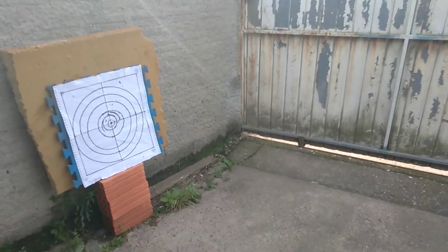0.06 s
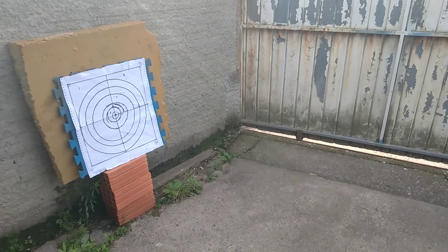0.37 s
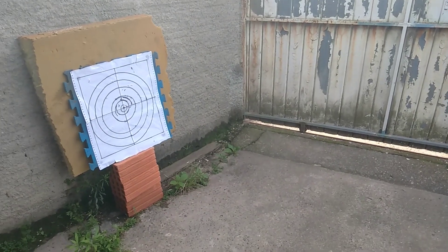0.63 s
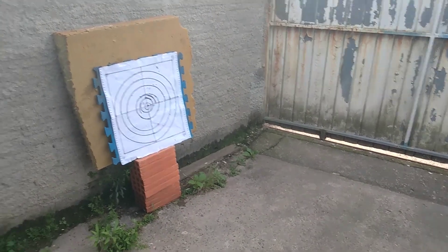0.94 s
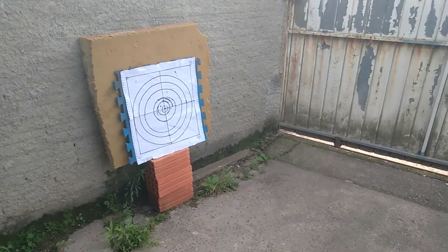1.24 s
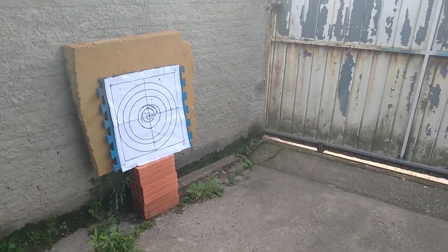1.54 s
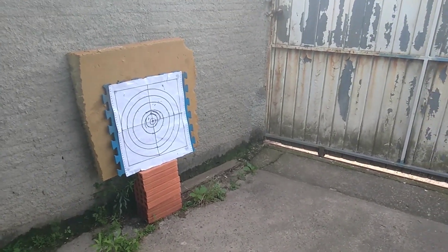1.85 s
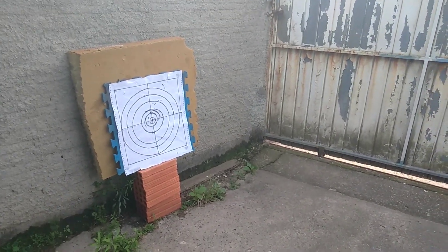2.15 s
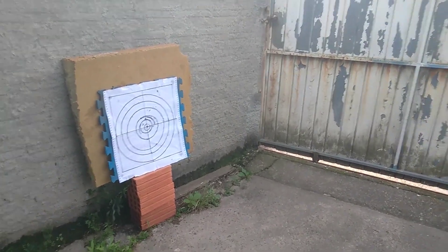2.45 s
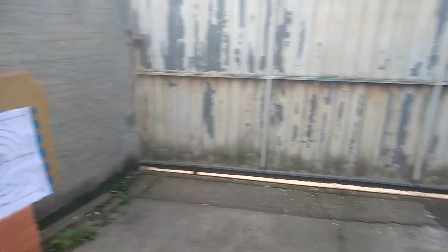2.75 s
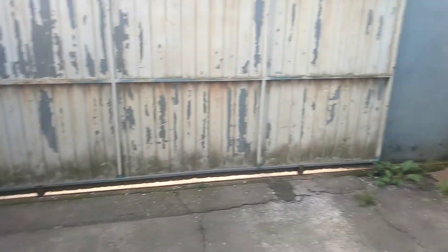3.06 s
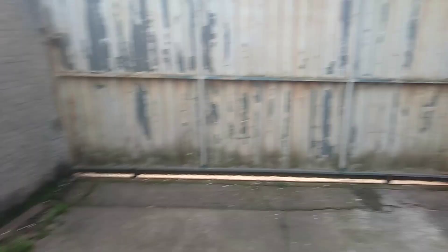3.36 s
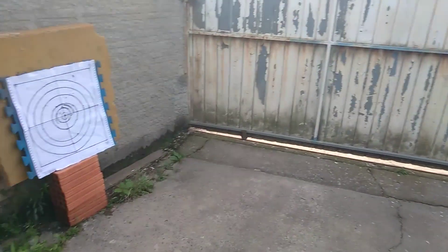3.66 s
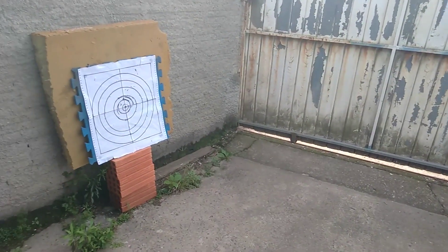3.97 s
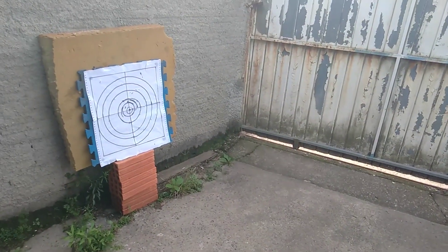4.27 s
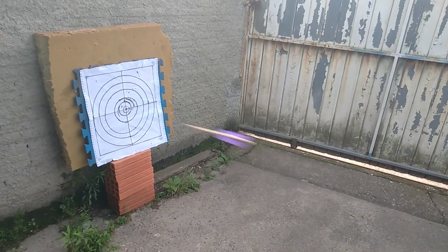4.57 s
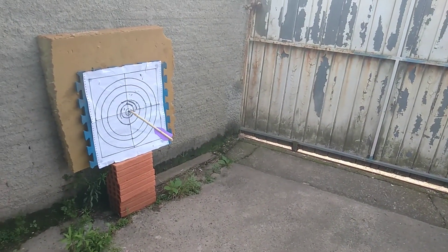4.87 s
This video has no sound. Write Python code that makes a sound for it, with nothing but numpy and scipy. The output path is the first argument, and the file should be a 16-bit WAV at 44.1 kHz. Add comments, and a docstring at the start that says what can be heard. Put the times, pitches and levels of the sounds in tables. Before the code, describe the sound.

In a small walled yard, faint birds twitter and distant dogs yelp over a low town rumble. Close to the microphone, a sleeve rustles and a hand makes soft scuffs and clicks while aiming. Near the end a crossbow fires with a sharp, woody snap. A split second later the arrow cracks through a paper target and thumps into the board behind it, both hits echoing briefly.

```python
"""A homemade crossbow fires in a small walled concrete yard: impacts of latch, string and limbs
excite the modes of its stock. A fifth of a second later the arrow cracks through a paper target
and drives the low modes of the board behind it. The walls return each impact as reverberation.
Before the shot, aiming makes soft friction rustles, scuffs and clicks, while small birds chirp,
far dogs yelp and a motor revs over the low rumble of a town."""
import sys
import numpy as np
from scipy import signal
from scipy.fft import rfft, irfft, next_fast_len
from scipy.io import wavfile

SR = 44100
rng = np.random.default_rng(int(sys.argv[2]) if len(sys.argv) > 2 else 0)


def dump_mix(stems):
    """Bounce the given channels to the path in sys.argv[1] as a 16-bit WAV at rate SR."""
    frames = np.atleast_2d(stems).T  # one column per channel
    limited = np.clip(frames, -1, 1)  # hard clip at full scale
    pcm = np.round(limited * 32767).astype(np.int16)
    wavfile.write(sys.argv[1], SR, pcm)


N = 216442
TIME = np.arange(N) / SR
ARRIVAL_S = 4.6882   # the arrow reaches the target


def from_db(db):
    """Amplitude ratio: a factor of ten for every 20 dB."""
    return 10 ** (np.asarray(db) / 20)

def unit_power(x):
    """Normalisation to a mean square of one."""
    return x / np.sqrt(np.mean(x ** 2) + 1e-20)

def at_hz(points, hz):
    """Interpolation on a logarithmic frequency axis."""
    f, value = np.transpose(points)
    return np.interp(np.log(np.maximum(hz, 1)), np.log(f), value)

def add(out, start_s, sound):
    """Superposition: a short sound sums into the mix at its onset."""
    start = max(round(start_s * SR), 0)
    out[start:start + len(sound)] += sound[:max(N - start, 0)]

def waver(size, rate):
    """Random modulation: a line through `rate` Gaussian values a second."""
    return np.interp(TIME[:size] * rate, np.arange(size), rng.standard_normal(size))

def swells(rows, rise, rest_db):
    """Incoherent addition: triangular envelopes, rising for the share `rise`, sum in power."""
    power = from_db(rest_db) ** 2
    for peak_s, length_s, db in rows:
        corners_s = [peak_s - rise * length_s, peak_s, peak_s + (1 - rise) * length_s]
        power = power + np.interp(TIME, corners_s, [0, from_db(db), 0]) ** 2
    return np.sqrt(power)

def colour(x, spectrum, keep_power=True):
    """Minimum-phase filtering: a folded cepstrum gives the spectrum a causal response."""
    size = 2 * next_fast_len(N * 2 // 3)
    gain = from_db(at_hz(spectrum, np.fft.rfftfreq(size, 1 / SR)))
    cepstrum = irfft(np.log(unit_power(gain) if keep_power else gain))
    cepstrum[1:size // 2] *= 2
    response = np.exp(rfft(cepstrum[:size // 2], size))
    return irfft(rfft(x, size) * response)[..., :N]

def ring(force, modes):
    """Modal superposition: each mode answers an impulse with a damped sinusoid."""
    out = 0
    for hz, db, t60 in modes:
        r, w = from_db(-60 / (t60 * SR)), 2 * np.pi * hz / SR   # pole radius and angle
        mode = signal.lfilter([0, np.sin(w)], [1, -2 * r * np.cos(w), r * r], force + 1e-18)
        out = out + from_db(db) * mode
    return out

def contacts(rows, start_s=0, slips=6):
    """All-pass dispersion: micro-slips spread each contact in time and leave its spectrum flat."""
    out = np.zeros(N)
    for s, db, smear_s in rows:
        burst = signal.unit_impulse(SR // 10)
        for lag in 2 + (smear_s * SR * rng.uniform(.1, 1, slips)).astype(int):
            allpass = np.r_[.5, np.zeros(lag), 1]
            burst = signal.lfilter(allpass, allpass[::-1], burst)
        add(out, start_s + s, from_db(db) * burst)
    return out

# Left-right coherence of sound from all around: frequency_hz, correlation
FIELD_COHERENCE = [(60, 0.95), (130, 0.94), (290, 0.9), (640, 0.55), (1410, -0.24), (3000, -0.023)]
def diffuse(size, coherence=FIELD_COHERENCE):
    """Diffuse field: white noise whose two channels agree at long wavelengths and part at short."""
    mid, side = rfft(rng.standard_normal((2, size)))
    alike = np.clip(at_hz(coherence, np.fft.rfftfreq(size, 1 / SR)), -1, 1)
    stereo = np.sqrt(1 + alike) * mid + np.sqrt(1 - alike) * side * [[1], [-1]]
    return unit_power(irfft(stereo, size))

def far_off(x, t60):
    """Multiple scattering: distant sound arrives only as decaying echoes between houses."""
    response = unit_power(diffuse(SR) * from_db(-60 * TIME[:SR] / t60)) / np.sqrt(SR)
    return signal.fftconvolve(x[None], response, axes=1)[:, :N]

# Reverberation time of the yard: frequency_hz, t60_s
YARD_DECAY = [(80, 0.35), (250, 0.46), (700, 0.43), (2000, 0.39), (4500, 0.37), (8000, 0.24), (15000, 0.2)]
def yard(x, direct_db, early_db, early_t60, late_db, build_s, coherence=FIELD_COHERENCE):
    """Reverberation: direct sound, dense early wall reflections and a tail that decays by band."""
    size = SR // 2
    t, hz = TIME[:size], np.fft.rfftfreq(size, 1 / SR)
    field, late = rfft(diffuse(size)), 0
    for centre, t60 in YARD_DECAY:
        band = at_hz([(f, f == centre) for f, _ in YARD_DECAY], hz)   # fades into its neighbours
        late = late + irfft(field * band, size) * from_db(-60 * t / t60)
    early = diffuse(size, coherence) * from_db(-60 * t / early_t60)
    build = 1 - np.exp(-(t / build_s) ** 2)   # reflections need time to arrive
    early = from_db(early_db) * unit_power(early * build)
    late = from_db(late_db) * unit_power(late * build)
    response = (early + late) / np.sqrt(size)
    response[:, 0] += from_db(direct_db)
    return signal.fftconvolve(x[None], response, axes=1)[:, :N]

# Spectra of open-air hiss and of town rumble: frequency_hz, relative_db
AIR_SPECTRUM = [(53, -31), (90, -3), (151, -7.5), (307, -10), (494, -14.5), (828, -14), (1360, -18),
                (2590, -18.5), (3500, -16), (4800, -18.5), (6200, -27), (10500, -33), (14200, -35),
                (15500, -61)]
RUMBLE_SPECTRUM = [(20, -35.5), (40, 3.5), (52, -11), (60, 4.5), (70, -9), (90, -9.5), (200, -45),
                   (1000, -77)]
def town(air_db=-60, rumble_db=-63, hum_db=-60, hum_hz=60.4):
    """Ambient noise: diffuse hiss and rumble, with a frequency-modulated hum."""
    air = from_db(air_db) * colour(diffuse(N), AIR_SPECTRUM)
    rumble = from_db(rumble_db) * colour(diffuse(N), RUMBLE_SPECTRUM)
    pitch_hz = hum_hz + 2 * waver(N, rate=6)
    hum = from_db(hum_db) * np.sin(2 * np.pi * np.cumsum(pitch_hz) / SR)
    return air + rumble + hum

# Strokes of a sleeve while aiming: peak_s, length_s, level_db
SLEEVE_STROKES = [(.02, 0.36, -66.5), (.42, 0.17, -64), (.775, .06, -58.5), (.86, 0.27, -68),
                  (.975, 0.13, -62.5), (1.13, 0.091, -62), (1.19, 0.57, -61.5), (1.34, 0.34, -62.5),
                  (1.51, 0.15, -59.5), (1.555, 0.38, -62), (1.665, 0.12, -59), (2.065, 0.15, -72.5),
                  (3.365, 0.08, -62.5)]
# Spectrum of rubbing cloth: frequency_hz, relative_db
CLOTH_SPECTRUM = [(300, -6), (1200, -7), (2400, 0), (4500, 0), (8000, 2.5), (12000, -3.5), (16000, -7)]
def sleeve(level_db=-2, grain_db=5, catch_db=1.5, crease_db=-4, creases_per_s=110, walls_db=5):
    """Stick-slip friction: cloth slides and catches, creases snap, and reflections blur into hiss."""
    hiss = rng.standard_normal(N)
    slide = unit_power(hiss * from_db(grain_db * waver(N, rate=260) + catch_db * waver(N, rate=65)))
    snaps = rng.random(N) < creases_per_s / SR
    creases = unit_power(snaps * from_db(3 * rng.uniform(-2, 2.3, N)))
    near = swells(SLEEVE_STROKES, rise=0.82, rest_db=-75) * (slide + from_db(crease_db) * creases)
    decay = np.exp(-1 / (0.023 * SR))   # reflected energy has a 23 ms time constant
    walls = np.sqrt(signal.lfilter([1 - decay], [1, -decay], near ** 2)) * diffuse(N)
    return from_db(level_db) * colour(near + from_db(walls_db) * walls, CLOTH_SPECTRUM)

def chirp(length_s, start_hz, end_hz, buzz_hz=130):
    """Frequency modulation: a linear glide with a fast random buzz."""
    u = np.linspace(0, 1, round(length_s * SR))
    pitch_hz = start_hz + (end_hz - start_hz) * u + buzz_hz * waver(len(u), rate=900)
    return np.sqrt(2) * np.sin(np.pi * u) * np.sin(2 * np.pi * np.cumsum(pitch_hz) / SR)

# Calls of the nearer birds, with one rising squeak of the stock at 1.28 s among them: start_s, start_hz,
# end_hz, level_db
BIRD_CALLS = [(.07, 5040, 5320, -59), (.17, 4500, 4160, -61), (.575, 5970, 6340, -64),
              (1.28, 2003, 2410, -52.5), (1.775, 4150, 4230, -61), (1.80, 3450, 3260, -61),
              (1.865, 5060, 5240, -57), (2.195, 5420, 5220, -59), (2.266, 4110, 3640, -56.5),
              (2.635, 7740, 6640, -65), (2.69, 7040, 6030, -65), (2.755, 4700, 3900, -62),
              (2.81, 7600, 6500, -66), (2.835, 5300, 5900, -59), (3.52, 5860, 5490, -54.5),
              (3.92, 6780, 6320, -63.5), (4.059, 3300, 3190, -59), (4.229, 6050, 5010, -56),
              (4.25, 4500, 3910, -62), (4.324, 6040, 5180, -69), (4.404, 5980, 5030, -57)]
# Bouts of twitter from the flock: peak_s, length_s, level_db
FLOCK_BOUTS = [(.18, 0.57, -58.5), (.46, 0.25, -62), (1.08, 0.93, -59.5), (1.29, 0.27, -54.5),
               (1.64, 0.42, -54.5), (1.92, 0.49, -62.5), (2.26, 0.2, -62), (2.48, 0.4, -57.5),
               (3.18, 0.63, -56), (3.62, 0.32, -57.5), (3.8, 0.59, -60), (4.28, 0.083, -69),
               (4.44, 0.53, -61)]
def birds(call_s=0.046, twitter_s=0.026, flock_hz=4400, spread=0.22, count=900):
    """Chorus effect: many overlapping chirps blur into twitter, and a few nearer ones stand out."""
    near, flock = np.zeros(N), np.zeros(N)
    for s, start_hz, end_hz, db in BIRD_CALLS:
        add(near, s, from_db(db) * chirp(call_s, start_hz, end_hz))
    for s, offsets in zip(rng.uniform(0, N / SR, count), rng.standard_normal((count, 2))):
        start_hz, end_hz = flock_hz * np.exp(spread * offsets)
        add(flock, s, chirp(twitter_s, start_hz, end_hz))
    bouts = swells(FLOCK_BOUTS, rise=0.48, rest_db=-82)
    return far_off(near, t60=0.34) + bouts * unit_power(far_off(flock, t60=0.44))

# Yelps of far dogs: start_s, length_s, pitch_hz, level_db
DOG_YELPS = [(0.306, 0.182, 812, -70.5), (0.763, .17, 800, -62), (1.518, 0.1653, 827.4, -50),
             (2.14, 0.17, 754, -64.5), (2.256, 0.155, 804.7, -54.5), (2.61, .15, 1043, -63.5),
             (3.039, 0.13, 607.5, -58.5), (3.22, 0.17, 1056, -65.5), (3.529, 0.157, 522, -61),
             (3.972, 0.086, 582, -62.5), (4.028, 0.13, 838.6, -53), (4.231, .15, 588.5, -60),
             (4.289, 0.14, 791.7, -52)]
def dogs(arch=0.1278, sag=0.059, jitter=0.055, overtone_db=-20):
    """Pitch jitter makes each arching yelp hoarse; distance leaves little but the fundamental."""
    out = np.zeros(N)
    for s, length_s, hz, db in DOG_YELPS:
        u = np.linspace(0, 1, round(length_s * SR))
        contour = 1 - arch * (2 * u - 1) ** 2 - sag * (u - .5)
        pitch_hz = hz * (contour + jitter * waver(len(u), rate=260))
        phase = 2 * np.pi * np.cumsum(pitch_hz) / SR
        voice = np.sin(phase) + from_db(overtone_db) * np.sin(2 * phase)
        add(out, s, from_db(db) * np.sqrt(2) * np.sin(np.pi * u) * voice)
    return far_off(out, t60=0.57)

def touches(rows, body_db, width_hz):
    """Resonance: each touch excites one band, which shifts with the place and the grip."""
    out = 0
    for s, db, smear_s, hz in rows:
        touch = contacts([(s, db, smear_s)])
        body = signal.lfilter(*signal.iirpeak(hz, hz / width_hz, fs=SR), touch + 1e-18)
        out = out + touch + from_db(body_db) * body
    return out

# Scuffs of a hand on the stock: start_s, level_db, smear_s, resonance_hz
HAND_SCUFFS = [(.752, -26, 0.0038, 1620), (.948, -27.5, 0.0037, 2420), (0.961, -27.5, 0.0029, 1800),
               (1.07, -35, .0015, 4460), (1.095, -43, 0.0017, 4400), (1.245, -31, 0.0031, 3940),
               (1.332, -29, 0.0032, 2570), (1.48, -30, 0.0054, 1850), (1.645, -30, 0.0034, 2580),
               (1.664, -37, 0.0035, 1860), (1.985, -33.5, 0.0027, 2020), (2.0605, -30.5, .0003, 1900),
               (3.344, -40, .0053, 2270), (3.389, -40, .0032, 1850)]
# A foot shifting on concrete: start_s, level_db, smear_s
FOOT_SHIFTS = [(1.706, -23, 0.0037)]
# Spectra of the hand and of the foot: frequency_hz, relative_db
HAND_SPECTRUM = [(200, -35), (900, -1), (1700, 0), (2500, 3.5), (4000, 3), (8000, 2), (15000, -14)]
FOOT_SPECTRUM = [(60, -30), (200, 6), (480, 11.5), (1000, -1), (3000, -3), (10000, -37)]
def scuffs(hand_db=-4, foot_db=-1):
    """Frictional excitation: a hand sounds the stock's hollow resonances and a foot scrapes dully."""
    hand = from_db(hand_db) * colour(touches(HAND_SCUFFS, body_db=13, width_hz=360), HAND_SPECTRUM)
    foot = from_db(foot_db) * colour(contacts(FOOT_SHIFTS), FOOT_SPECTRUM)
    return yard(hand + foot, direct_db=-1.5, early_db=1.5, early_t60=0.13, late_db=-2, build_s=0.0027)

# Clicks of the stock and of the lodged arrow: start_s, level_db, smear_s, resonance_hz
LIGHT_CLICKS = [(1.478, -30, .0009, 10500), (2.0612, -40, .0002, 6460), (2.157, -40.5, .0016, 7000),
                (2.5336, -37, .0003, 9000), (2.5425, -34, .0005, 9500), (2.5875, -34, .0004, 7800),
                (2.5965, -31.5, .0003, 6560), (4.8315, -22.5, .0005, 6600)]
# Spectrum of a click: frequency_hz, relative_db
CLICK_SPECTRUM = [(500, -39), (3200, -20), (6500, 3), (9000, -0.5), (13000, -2), (16000, -12)]
def clicks(level_db=-4):
    """Impulse excitation: brief contacts sound high, heavily damped resonances."""
    dry = from_db(level_db) * colour(touches(LIGHT_CLICKS, body_db=8, width_hz=1300), CLICK_SPECTRUM)
    return yard(dry, direct_db=-2, early_db=-3, early_t60=0.14, late_db=-8, build_s=0.0025)

# Two revs of a far motor: peak_s, length_s, level_db
MOTOR_REVS = [(2.33, 0.15, -56), (2.57, 0.42, -55.5)]
def motor(low_hz=100.6, top_hz=109, climb_hz_per_s=40.3):
    """Amplitude and frequency modulation: a rough tone swells twice, climbing from the first rev."""
    climb_hz = np.clip(low_hz + climb_hz_per_s * (TIME - MOTOR_REVS[0][0]), low_hz, top_hz)
    envelope = swells(MOTOR_REVS, rise=0.53, rest_db=-80.5) * from_db(2 * waver(N, rate=22))
    pitch_hz = climb_hz + 4 * waver(N, rate=26)
    return envelope * np.sin(2 * np.pi * np.cumsum(pitch_hz) / SR)

# Latch, string and limbs strike in turn: start_s, snap_db, latch_db, wood_db, smear_s
RELEASE_IMPACTS = [(4.4901, 1, 6.5, -11, 0.00013), (4.4934, -2.5, 7, -18, .00005),
                   (4.4963, -2.5, 9, -20, .00005), (4.5004, 0, -15, 1.5, 0.00011),
                   (4.5056, -9.5, -17, -0.5, .0004)]
# Spectrum of the string's snap: frequency_hz, relative_db
STRING_SPECTRUM = [(60, -50), (160, -8), (280, -3.5), (550, -10), (950, 2), (1300, -2), (1800, 6.5),
                   (3000, 5.5), (5000, 2.5), (8000, 10), (11000, 5.5), (14000, -0.5), (16000, -6)]
# Clinking modes of the latch: frequency_hz, level_db, t60_s
LATCH_RESONANCES = [(6500, -49, 0.012), (6740, -31, 0.02), (8100, -33, .02), (8130, -30, 0.02),
                    (9800, -29, .012), (11350, -29, .009)]
# Woody modes of stock and limbs: frequency_hz, level_db
STOCK_RESONANCES = [(740, -41), (860, -41), (1005, -35.5), (1120, -35), (1590, -40), (1655, -23.5),
                    (1720, -37), (2016, -29), (2300, -35.5), (2600, -34), (2910, -31)]
def crossbow(string_db=10, metal_db=5.5, stock_db=7, stock_t60=0.05, stock_low_hz=600):
    """Impact excitation: bright, then woody modes ring; the slim stock is a poor radiator of bass."""
    radiation = signal.butter(2, stock_low_hz, "high", fs=SR, output="sos")
    stock_modes = [(hz, db, stock_t60) for hz, db in STOCK_RESONANCES]
    out = 0
    for s, snap_db, latch_db, wood_db, smear_s in RELEASE_IMPACTS:
        blow = contacts([(s, 0, smear_s)])
        snap = from_db(string_db + snap_db) * colour(blow, STRING_SPECTRUM)
        clink = from_db(metal_db + latch_db) * ring(blow, LATCH_RESONANCES)
        knock = from_db(stock_db + wood_db) * signal.sosfilt(radiation, ring(blow, stock_modes))
        # each contact reaches the walls by its own paths
        out = out + yard(snap + clink + knock, direct_db=-19.5, early_db=-9, early_t60=0.16,
                         late_db=-9, build_s=0.00078)
    return out

# Point through paper, then shaft into foam: delay_s, level_db, smear_s, direct_db
PUNCTURES = [(0, 0.15, .00003, -18.5), (.0068, -1, .0005, -12)]
# Spectrum of bursting paper and foam: frequency_hz, relative_db
CRACK_SPECTRUM = [(60, -29), (170, -4), (280, 1), (480, -8.5), (850, -16.5), (1300, -15), (2200, -11),
                  (3300, -6), (3900, -8.5), (4700, -3), (7000, 1), (9500, 0.5), (12500, -6), (16000, -18)]
# Sound from one side, in antiphase near 3 kHz: frequency_hz, correlation (clipped at -1 in use)
CRACK_COHERENCE = [(250, 0.89), (550, 0.61), (920, 0.41), (1300, 0.66), (2100, 0.053), (2900, -1.7),
                   (3800, -1.4), (4900, 0.71), (6300, -0.1), (9000, -0.16)]
def arrow_crack(level_db=19.5):
    """Rupture and friction: the point bursts the paper, then the shaft rasps into the foam."""
    out = 0
    for delay_s, db, smear_s, direct_db in PUNCTURES:
        crack = colour(contacts([(delay_s, db, smear_s)], ARRIVAL_S), CRACK_SPECTRUM)
        out = out + yard(crack, direct_db, early_db=-4, early_t60=0.17, late_db=-9.5,
                         build_s=0.0014, coherence=CRACK_COHERENCE)
    return from_db(level_db) * out

# The arrow pushes the board, which rocks against the wall and settles: delay_s, level_db, push_s
BOARD_PUSHES = [(.0003, 0.2, 0.0011), (0.0397, -8, 0.00066), (.072, -8.5, .0013)]
# Modes of the leaning board: frequency_hz, level_db, t60_s
BOARD_RESONANCES = [(69, -15.5, 0.23), (117.6, -18.5, 0.33), (146.6, -19, .33), (173.4, -4, .08),
                    (186.2, -12, 0.21), (211.9, -13.5, 0.21), (250, -29, 0.38), (307, -22.5, 0.23),
                    (350, -23.5, 0.33), (433, -7.5, 0.031), (497, -28, 0.65), (577, -27, 0.19)]
def board_thump(level_db=-9):
    """Momentum transfer: soft force pulses from the stopping arrow set low plate modes booming."""
    force = 0
    for delay_s, db, push_s in BOARD_PUSHES:
        push = np.exp(-((TIME - ARRIVAL_S - delay_s - push_s) / (push_s / 2)) ** 2)
        force = force + from_db(db) * push / push.sum()
    boom = from_db(level_db) * ring(force, BOARD_RESONANCES)
    return yard(boom, direct_db=0.5, early_db=-20.5, early_t60=0.17, late_db=-15.5, build_s=0.025)

def scene():
    """Linear superposition: the shot and the aiming add to the quiet sounds around the yard."""
    shot = crossbow() + arrow_crack() + board_thump()
    aiming = scuffs() + clicks() + sleeve()
    return shot + aiming + dogs() + birds() + town() + motor()

# Response difference of the two microphone ports: frequency_hz, left_minus_right_db
PORT_DIFFERENCE = [(100, 1), (1300, 0), (2200, 1), (3200, -1), (4400, -4), (5500, -7), (7000, -9),
                   (9000, 0), (11500, 1.5), (15000, 6)]
def record(dry, low_cut_hz=47, high_cut_hz=15900, ceiling=0.9):
    """Transduction: each port colours its channel, the band is limited and peaks saturate softly."""
    left = colour(dry[0], [(hz, db / 2) for hz, db in PORT_DIFFERENCE], keep_power=False)
    right = colour(dry[1], [(hz, -db / 2) for hz, db in PORT_DIFFERENCE], keep_power=False)
    low_cut = signal.butter(6, low_cut_hz, "high", fs=SR, output="sos")
    high_cut = signal.ellip(10, .1, 80, high_cut_hz, fs=SR, output="sos")
    x = signal.sosfilt(low_cut, np.array([left, right]))
    rounded = x / (1 + (x / ceiling) ** 4) ** (1 / 4)
    return signal.sosfilt(high_cut, rounded)


dry = scene()
out = record(dry)
dump_mix(out)
```